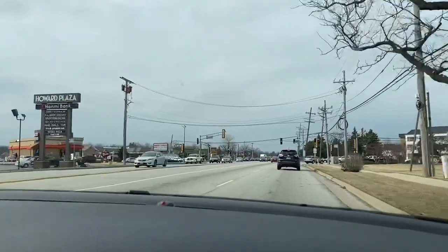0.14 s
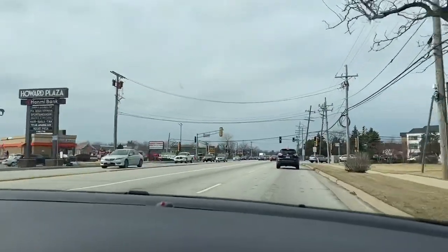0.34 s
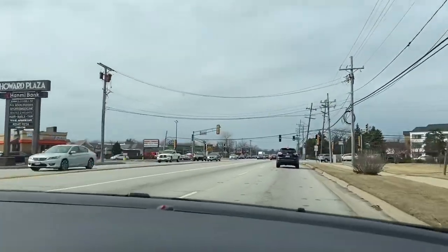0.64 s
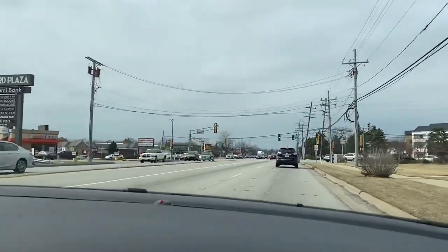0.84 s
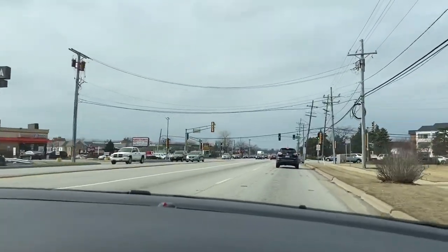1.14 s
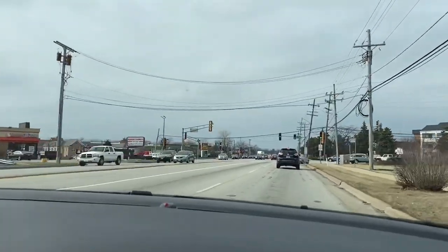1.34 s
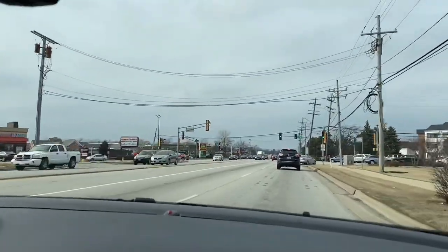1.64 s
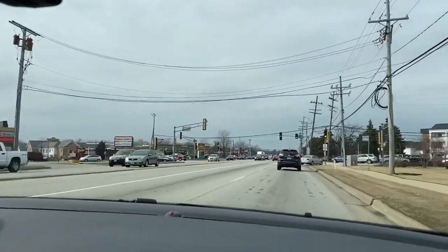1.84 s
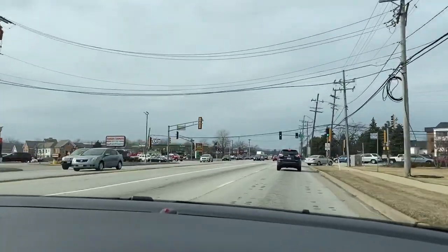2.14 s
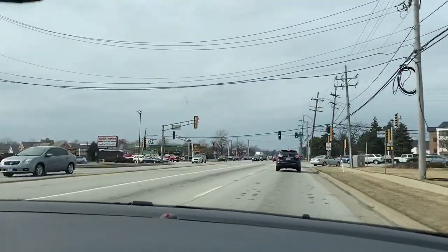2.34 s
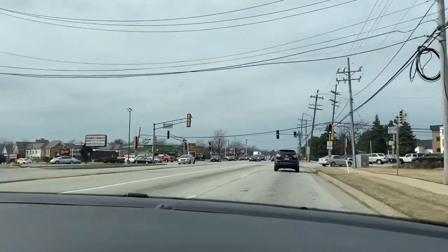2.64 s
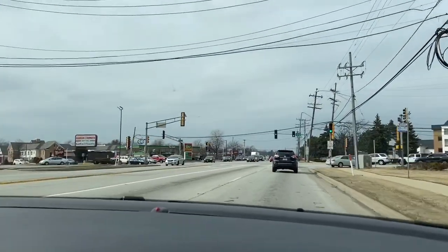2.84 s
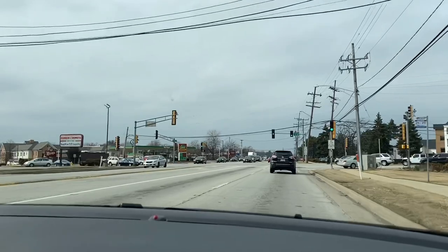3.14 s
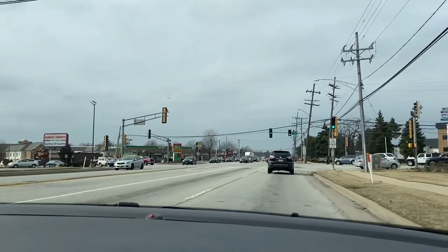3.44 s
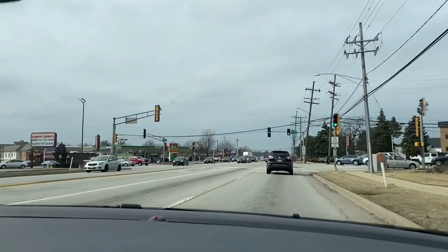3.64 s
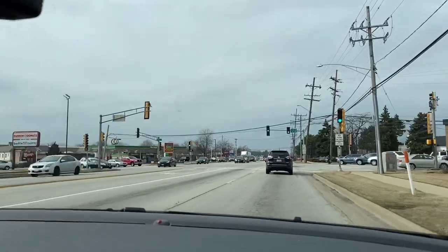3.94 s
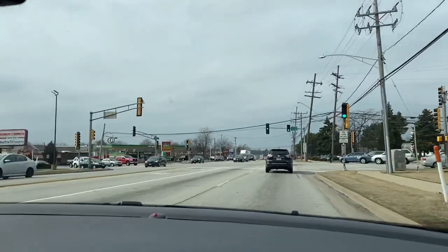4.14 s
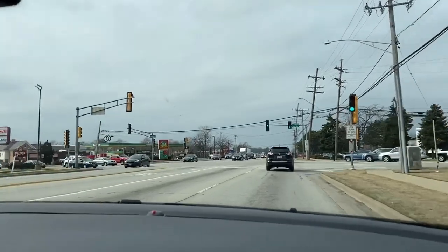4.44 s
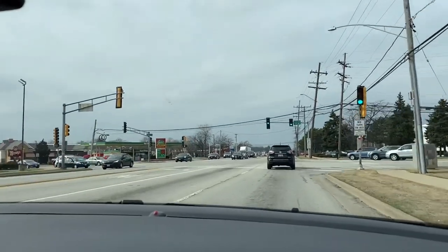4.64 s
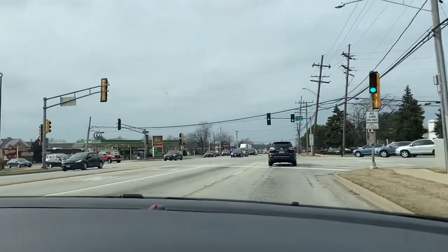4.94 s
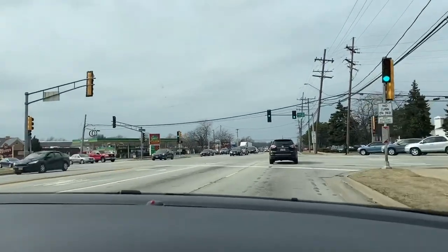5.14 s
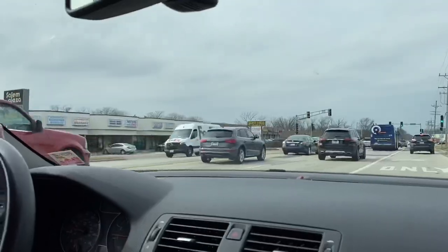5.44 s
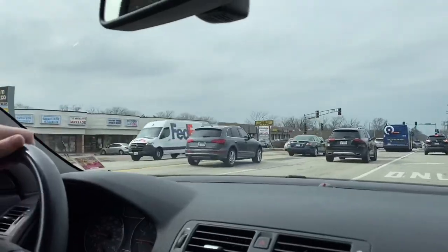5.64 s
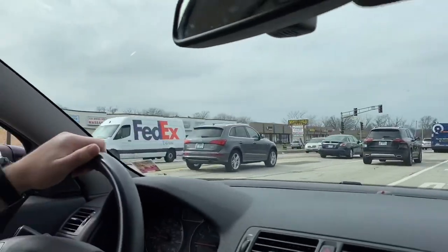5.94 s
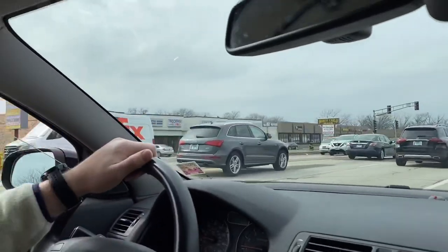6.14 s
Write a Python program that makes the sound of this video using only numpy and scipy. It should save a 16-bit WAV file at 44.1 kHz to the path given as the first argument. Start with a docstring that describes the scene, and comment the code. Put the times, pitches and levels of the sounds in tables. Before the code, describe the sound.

Boomy car cabin noise roughens over bumps, a wavering hum rises as it slows, sound drops out, then rumble resumes with indicator clicks.

```python
"""Inside a car on a city road: low booms of the shaken body, tyre roar, rushing air and buzzing trim, all made of noise.
Road joints thud and bumps set the body ringing, most of all on a rough patch from about 2.7 s.
From about 4.3 s, as the car slows, a droning hum of wavering partials swells.
Near 5.3 s the sound fades to silence, then returns on a slower stretch with other noise colours.
There the turn-signal relay ticks three times: a hard blow and a chatter ring its housing."""
import sys
import numpy as np
from scipy import signal
from scipy.fft import rfft, irfft, next_fast_len
from scipy.io import wavfile
from scipy.ndimage import uniform_filter1d

SR = 44100
rng = np.random.default_rng(int(sys.argv[2]) if len(sys.argv) > 2 else 0)


def to_wav(s):
    """Save 16-bit WAV."""
    ch = np.atleast_2d(s).T  # columns
    pcm = np.round(np.clip(ch, -1, 1) * 32767)  # PCM
    wavfile.write(sys.argv[1], SR, pcm.astype(np.int16))


N = 277389
TIME = np.arange(N) / SR  # seconds
FAST = TIME < 5.3  # true until the slower stretch

# The drone. Each row: time in seconds, pitch in Hz, level in dB, level of its octave in dB.
DRONE = [(4.2, 197.9, -61, -60), (4.5, 196.5, -36, -48), (4.62, 197, -27.5, -44),
         (4.762, 197, -22.5, -39.5), (4.883, 190.2, -25, -32.5), (4.981, 192.4, -25.5, -39),
         (5.07, 191.1, -22, -30), (5.15, 187.1, -24, -31), (5.22, 192.6, -25, -40.5)]
# The middle boom of the body. Each row: pitch in Hz, width in Hz, level in dB.
MID_BOOM = [(99.8, 20, 0)]


def amp(db):
    """Turn dB into a gain."""
    return 10 ** (np.asarray(db) / 20)


def rms_one(x):
    """Scale a sound to rms 1."""
    return x / np.sqrt(np.mean(x ** 2) + 1e-20)


def in_time(rows):
    """Turn the columns of a table into curves over every sample; the first column is seconds."""
    s, *columns = np.transpose(rows)
    return [np.interp(TIME, s, c) for c in columns]


def bell(start, half_length):
    """A bell-shaped rise and fall with its top, 1, at the given second."""
    return np.exp(-((TIME - start) / half_length) ** 2)


def drift(rate):
    """A random curve of spread 1 that wanders at about the rate in Hz."""
    step = 40  # samples between computed points
    r = np.exp(-2 * np.pi * rate * step / SR)
    noise = rng.standard_normal(N // step + 2002)
    slow = signal.lfilter([1], [1, -2 * r, r * r], noise)[2000:]  # skip the run-in
    return np.interp(np.arange(N) / step, np.arange(len(slow)), rms_one(slow))


def highpass(x, hz):
    """Keep what lies above a pitch."""
    return signal.sosfilt(signal.butter(2, hz, "high", fs=SR, output="sos"), x)


def resonate(x, hz, width):
    """One resonance, with gain 1 at its top."""
    r = np.exp(-np.pi * width / SR)
    return signal.lfilter([(1 - r * r) / 2, 0, (r * r - 1) / 2],
                          [1, -2 * r * np.cos(2 * np.pi * hz / SR), r * r], x)


def shaken(modes):
    """White noise, as of a rough road, drives each mode on its own, twice for steep flanks; rms 1."""
    total = 0
    for hz, width, db in modes:
        white = rng.standard_normal(N + SR)
        once = resonate(white, hz, width)
        ringing = resonate(once, hz, width)[SR:]  # the first second is run-in
        total = total + amp(db) * rms_one(ringing)
    return rms_one(total)


def banded(spectrum, shared_db, patchy_db):
    """Third-octave bands of noise follow a spectrum, with a shared and an own flicker; rms 1."""
    hz_at, db_at = np.transpose(spectrum)
    edges = 30 * 2 ** np.arange(0, 9.2, 1 / 3)
    white, out = rng.standard_normal((2, N)), np.zeros(N)
    for k, (low, high) in enumerate(zip(edges, edges[1:])):
        hz = np.sqrt(low * high)
        if hz_at[0] <= hz <= hz_at[-1]:
            bandpass = signal.butter(2, [low, high], "band", fs=SR, output="sos")
            band = signal.sosfilt(bandpass, white[k % 2])  # neighbours use different noise
            level_db = np.interp(np.log(hz), np.log(hz_at), db_at)
            out += amp(level_db + shared_db + patchy_db * drift(8.9)) * band
    return rms_one(out)


def boom(modes, level_db, even):
    """Body modes ring at a given level curve; their own chance swells are partly evened out."""
    x = shaken(modes)
    envelope = np.abs(signal.hilbert(x, next_fast_len(N))[:N])
    size = uniform_filter1d(envelope, size=900)
    return amp(level_db) * rms_one(x / (size + 1.0) ** even)


def patch():
    """How rough the road is: 0 when smooth, 1 on the rough patch, with a sharp start and a slow end."""
    # The rough patch: its start and its end, in seconds.
    start, end = (2.7, 3.93)
    rise_s, fall_s = 0.043, 0.87
    return np.clip((TIME - start) / rise_s, 0, 1) * np.exp(-np.clip(TIME - end, 0, None) / fall_s)


def shaking():
    """Levels in dB of five booms: steady shaking, more on the patch, and a swell at each bump."""
    # Each list holds one value in dB for the low, middle and high booms, floor panel and tyre air.
    # In turn: the steady level when fast, the steady level when slow, what the patch adds when fast.
    fast_db, slow_db, patch_db = (-26, -30.5, -29.5, -50, -43.5), (-29.5, -31.5, -28.5, -45, -53), (4.2, 3.7, 4.7, 8.2, 0.58)
    # The pitch in Hz at which each of the five is stirred by a bump.
    ring_hz = (60, 99, 123.4, 175, 227)
    # Bumps. Each row: time in seconds, pitch in Hz, peak in dB, half length in seconds.
    bumps = [(0.08, 226, -28.5, 0.04), (0.35, 226, -41.5, 0.029), (0.576, 228, -35.5, 0.034),
             (0.824, 168, -36.5, 0.065), (1.009, 119, -18.5, 0.028), (1.082, 103, -19.5, 0.031),
             (1.106, 230, -35.5, 0.056), (1.189, 60, -23, 0.061), (1.415, 225, -30.5, 0.033),
             (1.477, 122.3, -18, 0.055), (1.676, 60, -22, 0.13), (2.12, 98.7, -14.5, 0.031),
             (2.143, 226, -37.5, 0.028), (2.395, 60, -20.5, 0.071), (2.739, 228, -30, 0.015),
             (2.844, 60, -14, 0.018), (2.882, 103.4, -21, 0.06), (3.066, 60, -8.5, 0.053),
             (3.268, 105.8, -16.5, 0.073), (3.277, 224, -37.5, 0.057), (3.51, 113.8, -17, 0.078),
             (3.535, 60, -12, 0.081), (3.696, 101.2, -18.5, 0.017), (3.7, 226, -28, 0.03),
             (3.745, 60, -11.5, 0.036), (3.86, 122.4, -21, 0.051), (4.055, 105.7, -15, 0.036),
             (4.226, 99.2, -23, 0.038), (4.363, 60, -19, 0.063), (4.518, 60, -12, 0.036),
             (4.594, 114.4, -21, 0.033), (4.962, 94.7, -19.5, 0.086), (5.101, 60, -22.5, 0.029),
             (5.121, 94.2, -28.5, 0.035), (5.529, 60, -19, 0.05), (5.685, 118.7, -23.5, 0.14),
             (5.757, 173, -24, 0.019), (5.761, 60, -20.5, 0.016), (6.171, 59.6, -19.5, 0.044),
             (6.177, 174, -27.5, 0.049)]
    s, hz, db, length = np.transpose(bumps)
    # a bump stirs the booms near its pitch
    reach_octaves = 0.24
    reach = np.exp(-(np.log2(hz / np.array(ring_hz)[:, None]) / reach_octaves) ** 2)
    coarse = np.arange(0, N, 64) / SR
    bells = np.exp(-((coarse - s[:, None]) / length[:, None]) ** 2)
    lifts = reach @ (amp(db[:, None]) ** 2 * bells)
    rough, levels = patch(), []
    for fast, slow, more, lift in zip(fast_db, slow_db, patch_db, lifts):
        steady = amp(np.where(FAST, fast + more * rough, slow)) ** 2
        levels.append(10 * np.log10(steady + np.interp(TIME, coarse, lift)))  # powers add
    return levels


def air_hiss(hiss_db, flicker):
    """Air rushing by makes a soft high noise, coloured differently on each stretch."""
    # Hiss when fast, then when slow. Each row: frequency in Hz, level in dB per Hz.
    fast_colour = [(1000, -34), (1700, 5.5), (2230, 4), (2580, -0.5), (3700, -11.5), (4810, -54),
                   (8140, -120)]
    slow_colour = [(1000, -27), (1700, -2.5), (1830, -1), (2180, 3.5), (2440, 7), (3700, -23.5),
                   (4810, -34), (8140, -120)]
    fast = banded(fast_colour, 0.96 * flicker, patchy_db=1.33)
    slow = banded(slow_colour, 0.68 * flicker, patchy_db=3.2)
    return amp(hiss_db) * np.where(FAST, fast, slow)


def loose_trim(buzz_db, droning, flicker):
    """Resonances of loose trim follow the buzz, a little softer under the drone."""
    # Trim resonances. Each row: pitch in Hz, width in Hz, level in dB.
    trim = [(2220, 260, -0.5), (4670, 1100, 1.5), (6960, 1700, -2.5)]
    return amp(1.2 * (buzz_db + 65.5) - 69 - droning + 0.9 * flicker) * shaken(trim)


def trim_buzz(buzz_db, flicker):
    """Buzzing trim as high noise: a part common to both ears and a part opposite in them."""
    # Buzz in common, then opposite. Each row: frequency in Hz, level in dB per Hz.
    common_colour = [(2060, -35.5), (3500, 6.5), (7040, -5), (8210, -27.5), (9140, -30.5), (10400, -7),
                     (12300, -11.5), (13000, -29.5), (14500, -17), (16000, -24)]
    opposite_colour = [(2060, -37.5), (3500, 5), (5500, 0.5), (7040, -6.5), (8600, -4), (10400, -10),
                       (12300, -12.5), (13000, -29.5), (16000, -29)]
    common = amp(buzz_db - 0.23) * banded(common_colour, 0.4 * flicker, patchy_db=2.0)
    opposite = amp(buzz_db - 1.5) * banded(opposite_colour, 0.4 * flicker, patchy_db=2.0)
    return common, opposite


def creaks():
    """Faint clicks of trim: bright puffs of noise that die away within milliseconds."""
    # Clicks. Each row: start in seconds, level in dB (raised a little below).
    clicks = [(2.891, -55)]
    decay_s = 0.0047
    puffs = sum(amp(db + 1.5) * (TIME >= s) * np.exp(-np.clip(TIME - s, 0, 1) / decay_s)
                for s, db in clicks)
    return highpass(puffs * rng.standard_normal(N), 4000)


def swells():
    """Narrow bands of noise swell briefly under bell shapes."""
    # Swells. Each row: time in seconds, half length in seconds, pitch in Hz, width in Hz, level in dB.
    rows = [(0.61, 0.046, 6900, 500, -74.5), (.64, .05, 4600, 3000, -73), (1.43, .12, 4400, 1200, -68.5),
            (1.517, 0.096, 2160, 300, -60), (1.697, 0.041, 5030, 700, -81),
            (4.36, 0.046, 7000, 2800, -74.5), (4.6, 0.023, 7600, 600, -69), (4.7, 0.056, 4700, 530, -72),
            (4.928, .05, 6800, 650, -74), (5.038, 0.052, 4230, 496, -64), (5.119, 0.058, 2130, 600, -54),
            (1.72, .2, 890, 130, -52), (3.42, .25, 900, 270, -49), (5.513, .012, 810, 249, -40.5),
            (5.755, 0.015, 900, 380, -41.5), (2.504, 0.19, 322, 9.1, -46.5),
            (3.298, 0.54, 348.6, 12, -44.5), (0.69, 0.29, 345, 9.6, -45.5), (5.56, .03, 400, 98, -43.5),
            (5.677, 0.02, 320, 87, -34), (.1, 0.23, 273, 48, -50), (5.897, 0.41, 293, 37, -47.5),
            (6.151, 0.17, 423, 160, -42), (6.146, 0.16, 877, 360, -47)]
    return sum(amp(db) * bell(s, length) * shaken([(hz, width, 0)])
               for s, length, hz, width, db in rows)


def tyre_rush(rush_db, flicker):
    """The rush of the tyres: broad noise, with narrow cabin resonances while fast."""
    # Rush when fast, then when slow. Each row: frequency in Hz, level in dB per Hz.
    fast_colour = [(280, -34), (480, -16.5), (564, -7.5), (601, -9.5), (682, -3.5), (980, -2.5), (1040, -3),
                   (1340, -11.5), (1900, -29), (2470, -51.5), (4180, -120)]
    slow_colour = [(280, -32), (480, 6), (508, -25), (743, 5.5), (844, -1.5), (1200, -12.5), (1700, -19),
                   (1900, -19.5), (2470, -56), (4180, -120)]
    # Narrow cabin resonances. Each row: pitch in Hz, width in Hz, level in dB.
    narrow = [(552, 30, 0.5), (685, 25, 4), (817, 35, 2), (1042, 41, 1), (1257, 33, -1), (1385, 51, -9),
              (1900, 62, -6), (2210, 120, -9.5)]
    fast = banded(fast_colour, 0.44 * flicker, patchy_db=1.64)
    slow = banded(slow_colour, 1.0 * flicker, patchy_db=-0.4)
    ringing = FAST * amp(-9) * shaken(narrow)
    return amp(rush_db) * (np.where(FAST, fast, slow) + ringing)


def tyres_across(rush_db, flicker):
    """Tyre noise opposite in the two ears rises and falls with the rush."""
    # Opposite noise when fast, then when slow. Each row: frequency in Hz, level in dB per Hz.
    fast_colour = [(24, -34), (40, -8.5), (97, -6.5), (202, -7.5), (235, -1), (264, -12.5), (453, -14),
                   (529, -20.5), (980, -18.5), (1300, -27.5), (1800, -25), (2350, -40.5), (4000, -62.5),
                   (5200, -86), (8800, -120)]
    slow_colour = [(24, -33), (40, -10.5), (92, -4.5), (173, -4.5), (679, -21.5), (840, -14), (1140, -21),
                   (1230, -23.5), (1530, -26.5), (4000, -56), (5200, -69), (8800, -120)]
    # Resonances across the cabin, heard while fast. Each row: pitch in Hz, width in Hz, level in dB.
    cross = [(447, 60, -6), (580, 60, -9.5), (720, 77, -3.5), (954, 150, -2.5), (1010, 39, 0.5),
             (1255, 65, -5), (1450, 90, -10.5), (1590, 120, -8)]
    fast = amp(-39) * banded(fast_colour, 0.74 * flicker, patchy_db=-0.2)
    fast += amp(-44 + 0.91 * flicker) * shaken(cross)
    slow = amp(-40) * banded(slow_colour, 0.9 * flicker, patchy_db=1.3)
    return amp(0.92 * (rush_db + 47.5)) * np.where(FAST, fast, slow)


def tyre_roar(rush_db, droning, flicker):
    """Low tyre noise and cabin resonances, a little louder on the patch and under the drone."""
    # Roar when fast, then when slow. Each row: frequency in Hz, level in dB per Hz.
    fast_colour = [(88, -34), (150, -1.5), (199, -5.5), (231, 1.5), (259, -10), (371, -9.5), (520, -23.5),
                   (680, -63), (1140, -120)]
    slow_colour = [(88, -33), (150, -4.5), (183, -0.5), (252, -4.5), (290, -16.5), (383, -15), (520, -27),
                   (680, -65), (1140, -120)]
    # Cabin resonances. Each row: pitch in Hz, width in Hz, level in dB.
    cabin = [(162.2, 14, 1), (338.5, 20, -13), (374.8, 41, -5.5)]
    roar_db = -36 + 0.16 * (rush_db - rush_db.mean())  # takes a share of the rush's swing
    roar_db += 1.0 * FAST * patch() + 1.5 * droning
    fast = amp(-2.5) * banded(fast_colour, 1.1 * flicker, patchy_db=-1.5)
    slow = banded(slow_colour, 3.9 * flicker, patchy_db=2.0)
    ringing = amp(-2 + 0.7 * flicker) * shaken(cabin)
    return amp(roar_db) * (np.where(FAST, fast, slow) + ringing)


def panel_and_tyre_air(panel_db, cavity_db):
    """A floor panel and the air inside the tyres each ring at one pitch when the road shakes them."""
    # Tyre air, then floor panel. Each row: pitch in Hz, width in Hz, level in dB.
    cavity = [(226.4, 8.7, 0)]
    panel = [(174.8, 3.5, 0)]
    return boom(cavity, cavity_db, even=0.32) + boom(panel, panel_db, even=0.87)


def thuds():
    """Each road joint gives the body one short, rounded ring."""
    # Joints. Each row: time in seconds, pitch in Hz, peak in dB, half length in seconds.
    joints = [(0.129, 100.1, -15, .01), (.29, 70, -12, .01), (.41, 99.8, -14, .015), (.51, 119, -10, .014),
              (0.641, 115.6, -14, .018), (.879, 112.9, -11, .03), (1.663, 120, -13, .023),
              (1.914, 110.3, -13.5, .01), (2.137, 101, -11, .012), (2.304, 107.9, -12.5, .014),
              (2.408, 80, -11, .01), (4.275, 121.1, -13, .022), (2.761, 100.6, -4, .022),
              (2.828, 108, -5, .016), (2.887, 102.1, -10, .016), (2.946, 106, -10, 0.022),
              (3.169, 104, -7.5, 0.02), (3.25, 104.1, -1.5, 0.02), (3.298, 115.3, -10, .018),
              (3.36, 104.7, -9, .018), (3.49, 109.8, -13.5, 0.02), (5.535, 96.25, -11, .014),
              (5.751, 119.8, -12, .008), (5.824, 52, -11.5, 0.017), (6.114, 100.4, -15, 0.032),
              (6.12, 300, -28.5, .014), (6.196, 109.3, -16.5, 0.011)]
    turns = rng.random(len(joints))  # random starting phases
    return sum(amp(db) * bell(s, length) * np.sin(2 * np.pi * (hz * TIME + turn))
               for (s, hz, db, length), turn in zip(joints, turns))


def body_booms(low_db, mid_db, high_db):
    """The lowest body modes and a deep heave ring under one random throb shared by them all."""
    # Low booms, high booms and heave. Each row: pitch in Hz, width in Hz, level in dB.
    low_modes = [(52.23, 12, -2), (65.13, 15.3, 3)]
    high_modes = [(118.43, 17.5, 3), (132, 22, -8)]
    heave_modes = [(24.6, 22, -1), (38, 35, 0)]
    booms = boom(low_modes, low_db, even=0.47)
    booms += boom(MID_BOOM, mid_db, even=1.0)
    booms += boom(high_modes, high_db, even=1.0)
    booms += amp(np.where(FAST, -29, -22)) * shaken(heave_modes)
    return booms * amp(1.5 * drift(15))


def thin_whine(booms):
    """A faint 12 kHz tone multiplied by the booms, so its strength swings with them."""
    return amp(-65) * highpass(booms, 80) * np.sin(2 * np.pi * 12000 * TIME)


def drone():
    """Wavering partials on an unevenly sinking pitch; parts common to the ears and opposite in them."""
    # Four groups of partials: base, octave, upper and early.
    # Each row: multiple of the pitch, common level in dB, opposite level in dB, waver in dB.
    partials = [
        [(.5, -4, -14, 3), (1, 0, -8, .9), (1.5, -24, -19, 2)],
        [(1.94, -9, -14, 3), (2, -1, -7, 2), (2.1, -9, -14, 4)],
        [(2.86, -8, 0, 4), (3, -8, 7, 4), (3.6, -9, -12, 4), (4.5, -6, -9, 3.5), (5.3, -14, -4, 3),
         (6.6, -18, -7, 3)],
        [(1.5, 0, -6, 1.5)],
    ]
    # The upper group swells once, and the early one, a fifth above the drone, swells before it.
    # Each row: time in seconds, half length in seconds, top level in dB.
    upper, early = (4.99, 0.27, -45), (4.3, 0.33, -43.5)
    hz, base_db, octave_db = in_time(DRONE)
    levels_db = [base_db, octave_db]
    for s, length, top_db in (upper, early):
        levels_db.append(top_db - 10 * ((TIME - s) / length) ** 2)
    common, opposite = 0, 0
    for level_db, group in zip(levels_db, partials):
        for multiple, common_db, opposite_db, waver_db in group:
            blurred_hz = hz * (1 + 0.003 * waver_db * drift(15))  # wavering partials blur in pitch
            phase = 2 * np.pi * multiple * np.cumsum(blurred_hz) / SR
            size = amp(level_db + waver_db * drift(23))
            common = common + amp(common_db) * size * np.sin(phase)
            opposite = opposite + amp(opposite_db) * size * np.cos(phase)
    gate = np.sqrt(2) * FAST  # a sine of rms 1 peaks at the square root of 2
    return gate * common, gate * opposite


def relay():
    """Each tick sends a hard blow and a chatter of contact bounces into the ringing housing modes."""
    # Ticks. Each row: start in seconds, level in dB, length in ms, favoured pitch in Hz, its lift in dB.
    ticks = [(5.401, -37.5, 13, 3100, 6), (5.743, -40, 13, 1600, 10), (6.0605, -37, 9, 2700, 8)]
    # Housing modes. Each row: pitch in Hz, level in dB, seconds to fall by 60 dB.
    housing = [(1100, -9, 0.0095), (1380, -7, 0.009), (1850, -6.5, 0.0076), (2300, -10, 0.0036),
               (2750, -15, 0.0081), (3040, -6, 0.008), (3700, -17, 0.0028), (4660, -9.5, 0.0034),
               (6000, -8.5, 0.003), (7300, -4.5, 0.004), (10600, -12, 0.0024), (15000, -9, 0.0023)]
    strike_db, favour_octaves = 13, 0.4  # strength of the first blow, reach of the favoured pitch
    s, tick_db, ms, favour_hz, favour_db = np.transpose(ticks)
    chatter = []
    for start, db, length in zip(s, tick_db, ms):
        since_ms = np.clip(TIME - start, 0, 1) * 1000
        chatter.append(amp(db) * (TIME >= start) * np.exp(-(since_ms / length) ** 2.2))
    chatter, out = np.array(chatter), np.zeros(N)
    for hz, db, t60 in housing:
        near = np.exp(-(np.log2(hz / favour_hz) / favour_octaves) ** 2)
        push = amp(favour_db * near) @ chatter
        bounces = rng.standard_normal(N) * (rng.random(N) < 0.2)
        bounces[np.ceil(s * SR).astype(int) + 1] = amp(strike_db) * near  # the first blow
        blows = amp(db - 13) * push * bounces + 1e-18
        r, w = amp(-60 / (t60 * SR)), 2 * np.pi * hz / SR
        out += signal.lfilter([0, np.sin(w)], [1, -2 * r * np.cos(w), r * r], blows)
    return out


def scene():
    """Mix the layers into a part common to both ears and a part opposite in them."""
    # Rolling, one list for the fast stretch and one for the slow.
    # Each row: time in seconds, tyre rush in dB, air hiss in dB, trim buzz in dB.
    roll = [
        [(0.0, -44.5, -56.5, -69), (.42, -46.5, -57.5, -75.5), (.95, -48, -58.5, -76.5),
         (1.45, -45.5, -56, -72.5), (1.7, -45.5, -55, -68), (1.95, -45.5, -57, -77), (2.5, -47, -57.5, -68.5),
         (3.3, -43.5, -54, -64.5), (3.7, -44.5, -56, -65.5), (3.89, -46.5, -59.5, -73.5),
         (4.43, -45.5, -60.5, -72), (4.91, -47.5, -57.5, -63.5), (5.08, -47, -57, -63.5), (5.17, -47, -58, -66)],
        [(5.43, -45, -54, -63), (5.564, -42, -55.5, -63.5), (5.904, -42, -55.5, -63.5),
         (6.142, -40.5, -60, -64), (6.29, -43, -61, -63.5)],
    ]
    rush_db, hiss_db, buzz_db = in_time(np.vstack(roll))
    low_db, mid_db, high_db, panel_db, cavity_db = shaking()
    droning = FAST * amp(in_time(DRONE)[1] - np.max(np.transpose(DRONE)[2]))  # 1 at its loudest
    flicker = drift(33)  # a random flicker shared by the air, trim and tyre layers

    buzz, buzz_across = trim_buzz(buzz_db, flicker)
    air_and_trim = air_hiss(hiss_db, flicker) + loose_trim(buzz_db, droning, flicker) + buzz
    tyres = tyre_rush(rush_db, flicker) + tyre_roar(rush_db, droning, flicker)
    tyres += panel_and_tyre_air(panel_db, cavity_db)
    booms = body_booms(low_db, mid_db, high_db) + thuds()
    hum, hum_across = drone()
    clicks = relay() + creaks()
    common = air_and_trim + swells() + tyres + booms + thin_whine(booms) + hum + clicks

    # the booms also rock the body sideways
    twist = amp(-11) * boom(MID_BOOM, 0.62 * mid_db + 0.45 * low_db, even=0.3)
    across = tyres_across(rush_db, flicker) + twist + buzz_across + hum_across + 0.41 * clicks
    return np.array([common + across, common - across])


def record(dry):
    """Add microphone hiss, fade out and in, tilt the ears' tone, round peaks and cut the top."""
    # The fade. Each row: time in seconds, gain from 0 to 1.
    fade_rows = [(0, 0.96), (5.175, 0.89), (5.275, 0.02), (5.32, 0.06), (5.37, 0.36), (5.43, 0.78),
                 (6.29, 0.86)]
    # Full silence: its start and its end, in seconds.
    silent_from, silent_to = (5.277, 5.321)
    # Tone balance. Each row: frequency in Hz, left minus right in dB.
    balance = [(60, -1.5), (110, 0), (200, -4.5), (380, 2), (700, 4.5), (1290, -0.5), (2380, 0.5),
               (4400, 2), (8120, -0.5), (15000, -0.5)]
    mic_hiss_db, overload, cutoff_hz, edge_s = -95, 0.95, 16300, 0.002

    fade = np.clip(in_time(fade_rows)[0], 0, 1) * ((TIME < silent_from) | (TIME > silent_to))
    x = (dry + amp(mic_hiss_db) * rng.standard_normal((2, N))) * fade

    pad = 2048  # run-in for the filters
    x = np.pad(x, [(0, 0), (pad, pad)], "reflect", reflect_type="odd")
    size = next_fast_len(N + 2 * pad)
    hz = np.arange(size // 2 + 1) * SR / size + 1  # plus 1 keeps the logarithm finite
    balance_hz, balance_db = np.transpose(balance)
    lean_db = np.interp(np.log(hz), np.log(balance_hz), balance_db)
    x = irfft(rfft(x, size) * amp(np.outer([0.5, -0.5], lean_db)), size)  # half to each ear

    x = x / (1 + (x / overload) ** 4) ** 0.25  # peaks stay below the overload level
    x = signal.sosfilt(signal.cheby2(16, 70, cutoff_hz, fs=SR, output="sos"), x)
    # start and stop without a step
    edges = np.sin(np.pi / 2 * np.clip(np.minimum(TIME, TIME[::-1]) / edge_s, 0, 1)) ** 2
    return x[:, pad:pad + N] * (fade > 0) * edges


dry = scene()
out = record(dry)
to_wav(out)
```